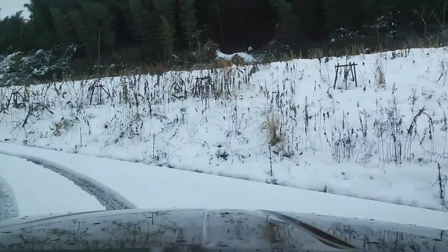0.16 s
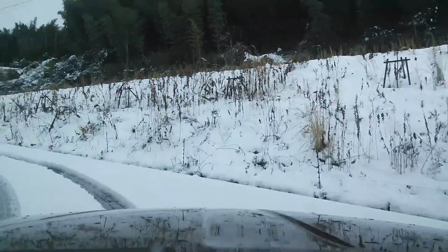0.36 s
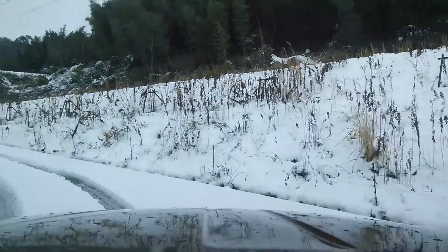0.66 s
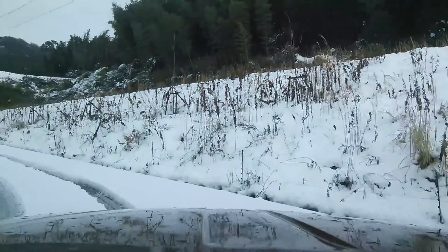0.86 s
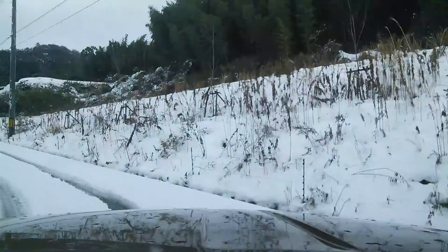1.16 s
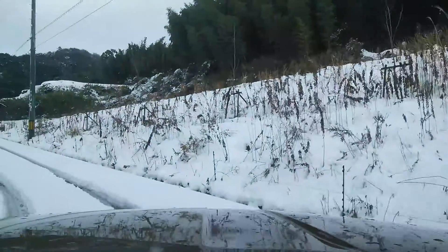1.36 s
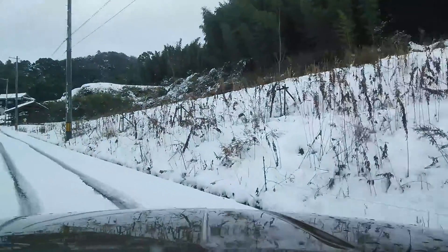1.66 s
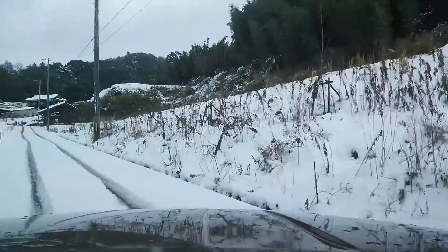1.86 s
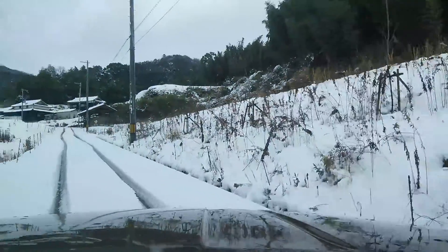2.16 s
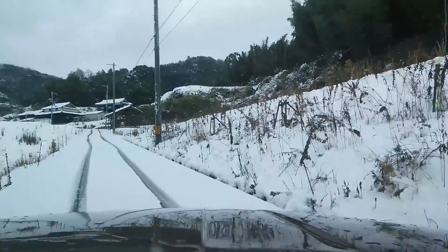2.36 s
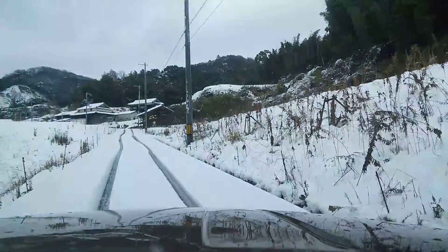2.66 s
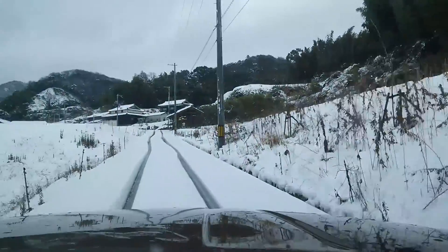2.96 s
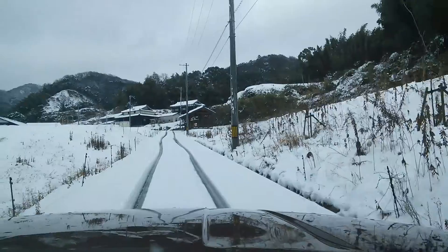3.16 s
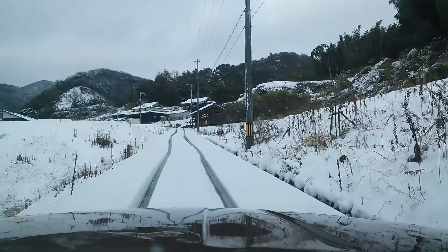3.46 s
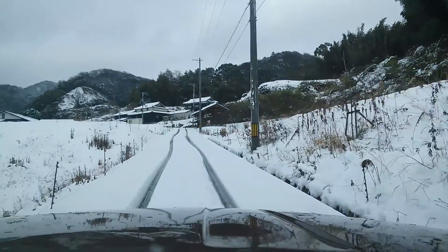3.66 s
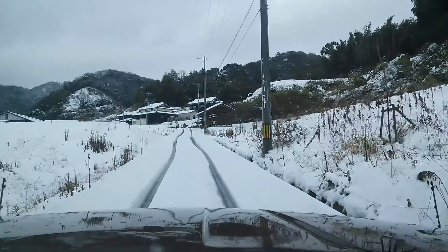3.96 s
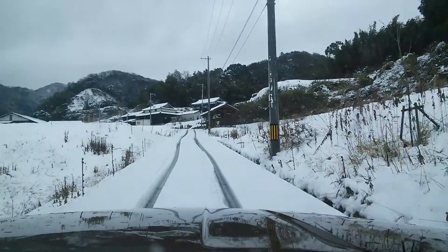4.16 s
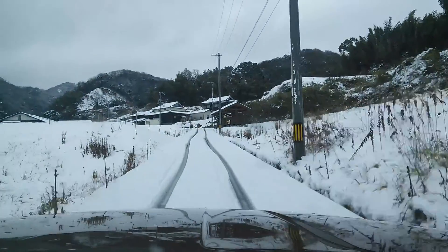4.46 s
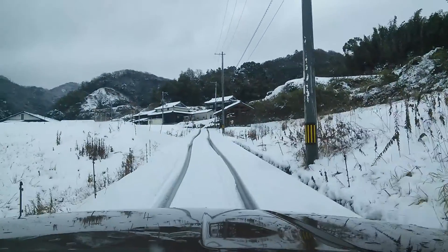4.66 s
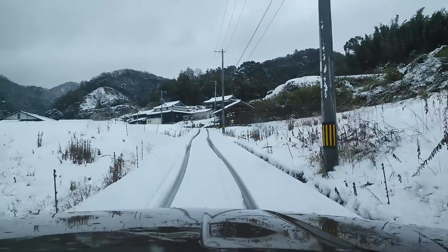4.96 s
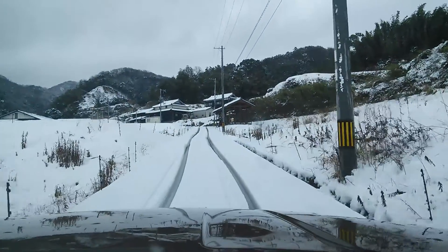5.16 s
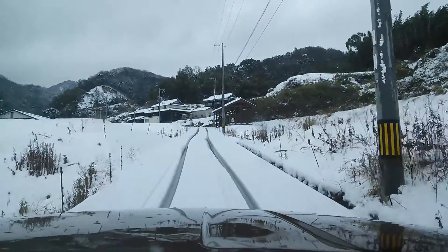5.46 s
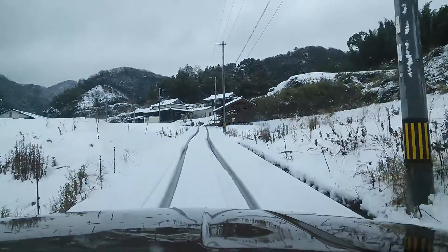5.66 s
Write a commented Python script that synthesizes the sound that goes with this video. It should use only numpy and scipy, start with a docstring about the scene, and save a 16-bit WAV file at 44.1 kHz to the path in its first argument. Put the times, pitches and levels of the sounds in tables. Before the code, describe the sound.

From inside a slow car on a snow-covered lane, a steady muffled engine drone dips at the start, recovers, then gradually climbs and strengthens. Soft tyre rumble and grainy snow crunch run beneath. A distinct body knock comes before one second; slush ticks and hiss grow busier later, with lighter bumps after four seconds. The microphone sits close in the cabin, behind the windscreen.

```python
"""Inside a car creeping along a snowy lane, slowly gathering speed.
From 0 s: a four-cylinder engine as sines at multiples of its cycle rate, a cabin boom, valve clatter and whines through
resonances; tyre rumble, rut jolts and wet-snow hiss as coloured noise; snow crunch as grains; faint treble tones.
From 0.1 s a short gliding steering whine; from 0.27 s slush ticks, as noise bursts and blurred rings; from 0.4 s crushed
clods, as swells of grains; from 0.6 s decaying sines: rut thuds, knocks over bumps, squeaks near 3.7 s."""
import sys
import numpy as np
from scipy import signal
from scipy.fft import rfft, irfft, next_fast_len
from scipy.io import wavfile
from scipy.ndimage import uniform_filter1d, map_coordinates

SR = 44100
rng = np.random.default_rng(int(sys.argv[2]) if len(sys.argv) > 2 else 0)


def pcm_store(signal):
    """Save signal as 16-bit PCM."""
    levels = np.round(np.clip(np.atleast_2d(signal), -1, 1) * 32767)
    wavfile.write(sys.argv[1], SR, levels.astype(np.int16).T)


N = 255780

# Levels are relative: the functions add trims and random wavering.
# engine speed: [t/s, four-stroke cycle rate/Hz]
CYCLE_RATE_HZ = [(0.0, 16.41), (0.24, 15.19), (0.42, 15.68), (0.58, 16.32), (0.82, 15.96), (1.18, 16.41),
                 (1.45, 16.26), (2.25, 16.89), (2.8, 17.91), (3.06, 18.38), (3.4, 17.98), (4.18, 18.7),
                 (4.4, 18.2), (4.58, 18.63), (4.8, 18.77), (5.0, 19.28), (5.4, 19.88), (5.8, 20.84)]
# how hard the engine pulls: [t/s, level/dB]
LOAD_DB = [(0, -45.5), (.25, -47), (.5, -38), (.85, -32.5), (1.5, -31.5), (2, -35), (2.5, -33),
           (2.78, -37.5), (3.05, -34.5), (3.6, -36.5), (4.2, -33.5), (4.42, -40.5), (4.7, -35),
           (4.95, -28.5), (5.1, -32), (5.3, -28.5), (5.55, -25.5), (5.8, -25)]
# engine block vibration: [multiple of cycle rate, level/dB]
BLOCK_LINES = [(6, -12), (7, -4.5), (9, -6), (10, -5), (11, 1), (12, 1), (13, 9.5), (14, -0.5), (16, -4),
               (17, -9), (18, -4.5), (19, -18.5), (20, -18), (21, -6), (22, -6.5), (23, -9), (24, -4),
               (25, -10.5), (26, -4), (27, 3), (28, -15.5), (29, -9), (30, 5), (31, 19), (32, 23)]
# transmission of mounts and panels into the cabin: [f/Hz, level/dB]
BODY_RESPONSE = [(80.0, -42), (170.0, -23.5), (210.0, -12.5), (240.0, -16.5), (275.0, -18.5),
                 (320.0, -12.5), (360.0, 0.5), (385.0, -7.5), (415.0, 6), (440.0, 2), (465.0, -9.5),
                 (500.0, -33), (600.0, -42), (720.0, -63)]
# panel shaken most by uneven firing: [f/Hz, width/Hz, level/dB]
SHUDDER_PANEL_MODES = [(411, 30.3, 0)]
# cabin air response to twice the firing rate: [f/Hz, level/dB]
CABIN_AIR_RESPONSE = [(122, -47), (125, -42), (128, -39.5), (134, -42), (141, -51), (146, -52), (149, -56),
                      (154, -43), (165, -45.5)]
# deep rumble from ruts: [t/s, level/dB]
RUT_LEVEL_DB = [(0, -49.5), (.3, -70.5), (.62, -56), (1.1, -49), (1.3, -58), (1.7, -54.5), (2.18, -46),
                (2.38, -49.5), (2.65, -47.5), (3.5, -56.5), (4.1, -57), (4.7, -61), (5.1, -54),
                (5.8, -52.5)]
# valve clatter: [t/s, level/dB]
VALVE_LEVEL_DB = [(0, -49.5), (.45, -52), (.85, -50.5), (1.3, -52.5), (1.8, -52.5), (2.3, -49), (3, -48),
                  (4.2, -47.5), (4.4, -50), (4.7, -47.5), (5.8, -45)]
# valve train resonances: [f/Hz, width/Hz, level/dB]
VALVE_MODES = [(723, 86, 6), (850, 110, 2.5), (915, 68, 13), (1015, 202, -0.5), (1213, 67, -6),
               (1380, 41, 7.5), (1618, 27, -4), (1930, 210, -9), (2670, 120, -8)]
# engine whine: [t/s, level/dB]
WHINE_LEVEL_DB = [(0, -68), (1.2, -59.5), (1.8, -46), (2.2, -53.5), (2.7, -53.5), (2.9, -48.5),
                  (3.6, -51.5), (4.2, -48.5), (4.38, -63), (4.6, -45.5), (5.05, -48.5), (5.8, -47.5)]
# whining engine overtones: [multiple of cycle rate, level/dB]
WHINE_LINES = [(48, 4.5), (56, 4), (66, -3), (72, -3), (74, -2), (76, -6)]
# cover resonances the overtones sweep through: [f/Hz, width/Hz, level/dB]
COVER_MODES = [(958, 35, 6.5), (1100, 86, -3.5), (1355, 100, 2.5)]
# transmission of the bulkhead: [f/Hz, level/dB]
BULKHEAD_RESPONSE = [(1000, -2.5), (2000, 1.5), (2750, -1), (3300, -14.5), (5000, -13), (9000, -31)]
# tyre rumble in the cabin: [f/Hz, level/dB per Hz]
ROAD_SPECTRUM = [(40, -27), (100, -14), (160, -4.5), (220, -1.5), (330, 2), (560, -2.5), (830, -10.5),
                 (980, -10), (1180, -18), (1650, -15), (2250, -26), (2650, -25), (3200, -35), (7000, -52)]
# suspension rolling over ruts: [f/Hz, level/dB per Hz]
RUT_SPECTRUM = [(10, -14), (25, -2), (42, -6), (70, -3), (100, -4), (160, 1), (400, -58)]
# panel resonances: [f/Hz, width/Hz, level/dB]
PANEL_MODES = [(445.3, 33.6, 2), (405, 114, -6.5)]
# wet-snow hiss, swelling in slushy stretches: [t/s, level/dB]
HISS_LEVEL_DB = [(0, -65.5), (.2, -74), (.5, -69.5), (.8, -63.5), (.95, -71), (1.08, -67.5), (1.3, -76),
                 (1.55, -69), (1.75, -71), (1.95, -68), (2.15, -72), (2.42, -69.5), (2.55, -62.5),
                 (2.78, -57), (3.02, -63.5), (3.45, -54.5), (3.75, -61.5), (4.05, -64), (4.3, -62.5),
                 (4.43, -68), (4.76, -50.5), (5.03, -63.5), (5.4, -68), (5.55, -60.5), (5.8, -62.5)]
# wet snow under the tyres: [f/Hz, level/dB per Hz]
WET_SPECTRUM = [(1500, -32), (2800, -5.5), (4200, 2), (5600, -4.5), (7500, 1.5), (9500, 2.5), (13000, 1),
                (16000, 1.5)]
# thin hiss left where the snow is dry: [f/Hz, level/dB per Hz]
DRY_SPECTRUM = [(2000, -6), (3700, -1.5), (4900, -4), (5750, 3.5), (6600, -3), (7800, -5.5), (10000, -1.5),
                (13000, -0.5), (15700, -0.5)]
# final drive whine, follows road speed: [t/s, f/Hz, level/dB]
GEAR_WHINE = [(0, 590, -66), (.6, 603, -53), (1.2, 611, -51), (1.8, 616, -52), (2.55, 652, -53),
              (3.0, 680, -62), (3.95, 708, -58), (4.2, 717, -46), (4.45, 728, -49.5), (4.55, 735, -56),
              (4.66, 744, -43.5), (4.78, 752, -56), (4.95, 764, -49.5), (5.25, 783, -55), (5.8, 820, -58)]
# faint treble singing: [f/Hz, level/dB]
SINGING_TONES = [(5922, -86), (8904, -91), (9889, -86)]
# short thin whine while steering out of the bend: [t/s, f/Hz, level/dB]
STEERING_WHINE = [(.1, 785, -75), (.2, 772, -52), (.28, 765, -48), (.4, 768, -54), (.5, 770, -120)]
# slush hits on the wheel arches:
# [t/s, peak level/dB, spray re peak/dB, ring f/Hz, ring re peak/dB, ring t60/s]
SLUSH_HITS = [(0.27, -36, -35.5, 2320, -10, .06), (0.471, -48, -12.5, 3230, 3, 0.08),
              (0.522, -43.5, -22, 3800, -3, 0.076), (0.992, -50, -25, 4700, -6, .06),
              (1.068, -52, -5.5, 2870, 5, 0.091), (1.516, -54.5, -23, 4600, -2, .07),
              (1.869, -44, -21, 4700, -13, .06), (2.462, -39.5, -15, 3050, -7, 0.076),
              (2.6567, -40, -21, 4900, -3, .06), (2.704, -38.5, -32, 4600, -8, .06),
              (2.741, -45.5, -25.5, 4550, -6, .06), (3.043, -40.5, -10.5, 5510, -6, .06),
              (3.618, -36, -10.5, 2700, -14, 0.072), (3.677, -48.5, 0, 5300, -8, .06),
              (3.75, -45.5, 7.5, 5160, -9, .06), (3.872, -47, -13.5, 4500, -9, .07),
              (3.912, -41, -10, 2880, 5.5, .14), (4.2453, -29.5, -12, 3510, -11, .17),
              (4.2875, -48.5, 4, 3350, -6, .08), (4.485, -47, -28, 4380, -6, .06),
              (4.5158, -42.5, -5, 2930, 5.5, 0.14), (4.55, -45, -15.5, 2700, -2, .08),
              (4.741, -40.5, -20.5, 2750, 3, .07), (4.826, -40, -5, 3730, -3, 0.17),
              (4.8673, -43, -1.5, 3850, 3, 0.098), (4.922, -54, 7.5, 2830, 2, .07),
              (5.081, -46, -9, 4350, -7, .07), (5.109, -38, -7.5, 2850, -3, 0.14),
              (5.135, -40.5, -8.5, 2980, -5, .12), (5.44, -36, -5, 5170, -10, 0.11),
              (5.4937, -42.5, -2, 4400, -9, .07), (5.7215, -39.5, -11, 4650, -13, 0.064),
              (5.759, -43, -10.5, 4250, -2, .07)]
# wheel arch resonances: [f/Hz, width/Hz, level/dB]
ARCH_MODES = [(2260, 440, 0.5), (2740, 440, 4), (3610, 130, 5), (4580, 750, 4.5), (5700, 1600, 0.5),
              (6570, 330, 1.5)]
# spread of a wet spot's ring: [offset from its pitch f/Hz, level/dB]
RING_BLUR_SPECTRUM = [(380, 0), (750, -12), (2200, -70)]
# bright spray of a slush hit: [f/Hz, level/dB]
SPRAY_SPECTRUM = [(4000, -39.5), (7500, 4.0), (11500, 2.0), (16000, -2.5)]
# packed-snow clods crushed under a tyre: [t at middle/s, length/s, level/dB, f/Hz]
CLOD_EVENTS = [(0.406, 0.13, -36.5, 360), (1.526, 0.079, -45, 857), (2.274, 0.072, -48, 1080),
               (2.546, 0.11, -45, 615), (2.797, 0.089, -49, 796), (2.863, 0.072, -37, 567),
               (3.123, 0.32, -56, 1300), (4.05, 0.066, -39.5, 608), (4.19, 0.11, -49, 1240),
               (4.415, 0.056, -41, 668), (4.7, 0.045, -40, 657), (5.033, 0.066, -48, 653),
               (5.16, 0.21, -46, 1060)]
# soft thud of a wheel dropping into a rut: [t/s, level/dB, f/Hz]
THUD_EVENTS = [(0.62, -42, 58), (2.19, -35, 78), (2.36, -40, 66), (2.65, -40, 72), (4.11, -43, 48)]
# body knocks over bumps: [t/s, level/dB, dulling/(dB per octave)]
KNOCK_EVENTS = [(0.822, -15, 2.5), (4.183, -26.5, 10), (4.399, -34, 9), (4.716, -28, 9), (4.777, -29, 9)]
# body modes a knock rings: [f/Hz, level/dB, t60/s]
KNOCK_BODY_MODES = [(345, -4, .1), (435, 1, .1), (550, -2, .07), (585, -2, .07), (800, -9, .05),
                    (1020, -8, .06), (1230, -9, .06), (1400, -12, .05), (1560, -11, .05)]
# tiny squeaks: [t/s, level/dB, f/Hz]
SQUEAK_EVENTS = [(3.676, -49.5, 5330), (3.754, -45.5, 5380), (3.753, -53.5, 4140)]

CRUISE_RATE_HZ = 18  # engine cycle rate at which the next two base levels hold
ROAD_DB, ROAD_RISE_DB_PER_HZ = -40.5, 1
GROWL_DB, GROWL_RISE_DB_PER_HZ = -42, 8  # no further rise above cruise
THROB_MULTIPLE, THROB_LAG_S = 24, .035  # throb centres on this multiple, falls later in the cycle at speed
SHUDDER_DB = -13  # random shaking by uneven firing, re engine load
BOOM_RUT_SHARE, USUAL_RUT_DB = 0.83, -54.5  # boom swells by this share of the rut level above usual
CLATTER_PEAK_CYCLES = .17  # strongest here and half a cycle later
ROAR_PATCH_DB, ROAR_SWELL_DB = 1.8, 1.3  # rms depths: random patches; swelling
SHAKE_DB = -3.5  # panel shaking re mean of road and load levels
TRIM_HZ = 1500  # cabin trim absorbs panel sound above this
TOP_HZ = 15850


def amp(db):
    """Decibels to gain."""
    return 10 ** (np.asarray(db) / 20)


def unit(x):
    """Scale to rms 1."""
    return x / np.sqrt(np.mean(x ** 2) + 1e-20)


def along(points, hz):
    """(f/Hz, value) points read on a log-frequency axis."""
    f, v = np.transpose(points)
    return np.interp(np.log(hz + 1), np.log(f + 1), v)


def curves(rows):
    """One value per sample for each column after the time."""
    s, *cols = np.transpose(rows)
    return [np.interp(np.arange(N) / SR, s, c) for c in cols]


def wobble(rate_hz):
    """Smooth random curve, rate_hz knots a second."""
    coarse = np.arange(0, N + 100, 100)
    knots = rng.standard_normal(1024)
    smooth = map_coordinates(knots, [coarse * rate_hz / SR], mode="mirror")
    return np.interp(np.arange(N), coarse, smooth)


def filtered(x, response):
    """x times a complex response of frequency."""
    m = next_fast_len(N + SR // 2)
    return irfft(rfft(x, m) * response(np.fft.rfftfreq(m, 1 / SR)), m)[:N]


def resonate(x, modes):
    """x through parallel (f/Hz, width/Hz, level/dB) resonances of alternating sign."""
    def response(f):
        total = 0
        for k, (centre, width, db) in enumerate(modes):
            damping = 1j * f * width
            total = total + (-1) ** k * amp(db) * damping / (centre * centre - f * f + damping)
        return total
    return filtered(x, response)


def noise(spectrum):
    """Noise of rms 1 with the given colour."""
    return unit(filtered(rng.standard_normal(N), lambda hz: amp(along(spectrum, hz))))


def panel_noise(modes):
    """Panels shaken at random, rms 1, dulled by the trim."""
    shaken = resonate(rng.standard_normal(N), modes)
    return unit(filtered(shaken, lambda hz: 1 / np.sqrt(1 + (hz / TRIM_HZ) ** 6)))


def patchy(x, depth_db, size):
    """x grows louder and softer in random patches of time and pitch; size is their (bins, frames)."""
    z = signal.stft(x, nperseg=2048)[2]
    field = rng.standard_normal(z.shape)
    for axis in (0, 1, 0, 1):
        field = uniform_filter1d(field, size[axis], axis)
    return unit(signal.istft(z * amp(depth_db * unit(field)), nperseg=2048)[1][:N])


def tone(rows, waver_db, slip_rad):
    """Unsteady sine along (t/s, f/Hz, level/dB) points with a wandering phase."""
    hz, db = curves(rows)
    phase = 2 * np.pi * np.cumsum(hz) / SR + slip_rad * wobble(35)
    return amp(db + waver_db * wobble(14)) * np.sqrt(2) * np.sin(phase)


def drone(rate_hz, cycle, load_db, growl_db, unsteady_db, slip_rad):
    """Unequal cylinders give lines at multiples of the cycle rate; each swells as it crosses a panel resonance."""
    growl, throb = np.zeros(N), np.zeros(N)
    lag_cycles = THROB_LAG_S * (rate_hz - CRUISE_RATE_HZ)
    for k, db in BLOCK_LINES:
        # bending waves run faster at high pitch: each throb reaches the cabin treble first
        delay_cycles = 1.2 * k - .0185 * k * k
        gain = amp(db + along(BODY_RESPONSE, k * rate_hz) + unsteady_db * wobble(4.925))
        phase = 2 * np.pi * (k * cycle - delay_cycles) + slip_rad * wobble(7.7)
        if k < 16:
            growl += gain * np.cos(phase)
        else:
            throb += gain * np.cos(phase - 2 * np.pi * (k - THROB_MULTIPLE) * lag_cycles)
    shudder = amp(SHUDDER_DB) * panel_noise(SHUDDER_PANEL_MODES)
    return amp(growl_db - .5) * unit(growl) + amp(load_db - 1) * (throb + shudder)


def boom(rate_hz, cycle, ruts_db):
    """Twice the firing rate excites the cabin air, loudly at a resonance and where the engine strains over ruts."""
    multiple = 8  # four firings per cycle, doubled
    boom_db = along(CABIN_AIR_RESPONSE, multiple * rate_hz) + BOOM_RUT_SHARE * (ruts_db - USUAL_RUT_DB)
    return amp(boom_db) * np.sqrt(2) * np.sin(2 * np.pi * multiple * cycle + 0.042 * wobble(8.4))


def valve_train(cycle, scatter_db, pulse_db):
    """Dense clatter, repeating each engine cycle and swelling once per crank turn, rings the engine's covers."""
    pattern = rng.standard_normal(512)
    clatter = unit(map_coordinates(pattern, [cycle % 1 * len(pattern)], mode="grid-wrap"))
    swell = amp(pulse_db * np.cos(2 * np.pi * 2 * (cycle - CLATTER_PEAK_CYCLES)))
    repeating = unit(resonate(swell * clatter, VALVE_MODES))
    scattered = unit(resonate(swell * rng.standard_normal(N), VALVE_MODES))
    return unit(repeating + amp(scatter_db) * scattered)


def whine(cycle, waver_db):
    """High overtones glide with the engine, beat once per crank turn and sing out at resonances."""
    slip_rad = .8 * wobble(14) + .4 * wobble(70)
    lines = np.zeros(N)
    for k, db in WHINE_LINES:
        gain = amp(db + waver_db * wobble(11))
        phase = 2 * np.pi * k * (cycle - CLATTER_PEAK_CYCLES) + slip_rad + .35 * wobble(14)
        lines += gain * np.sin(phase)
    return unit(resonate(lines, COVER_MODES))


def crunch(pitch_hz, spread, cycles, size_db, count):
    """Snow gives way under the treads in small muffled grains, each with its own pitch and size."""
    t = np.arange(SR // 25) / SR
    start, pitch, size = rng.random(count), rng.standard_normal(count), rng.standard_normal(count)
    hz = pitch_hz * np.exp(spread * np.clip(pitch, -2, 2))[:, None]
    gain = amp(size_db * np.clip(size, -2, 2))[:, None] * (pitch_hz / hz)
    age = hz * t / cycles
    grains = gain * age * np.exp(-age) * np.sin(2 * np.pi * hz * t)
    at = (start * N).astype(int)[:, None] + np.arange(len(t))
    return unit(np.bincount(at.ravel(), grains.ravel(), N)[:N])


def tyres(road_db, ruts_db, load_db):
    """Broad rumble from packed snow, deep jolts from ruts, panels shaken at random."""
    roar = patchy(noise(ROAD_SPECTRUM), ROAR_PATCH_DB, size=(4, 3))
    rumble = amp(road_db + 1.0 + ROAR_SWELL_DB * wobble(8.3)) * roar
    jolts = amp(ruts_db + 1.0 + 1.1 * wobble(9.0)) * noise(RUT_SPECTRUM)
    shaking_db = .5 * (road_db + load_db) + SHAKE_DB + 1.5 * wobble(20)
    shaken = amp(shaking_db) * panel_noise(PANEL_MODES)
    return rumble + jolts + shaken


def wet_snow(hiss_db, dry_db):
    """Thin hiss, growing fuller, louder and grainy where the treads press through slush."""
    total = amp(hiss_db + 1.6 * wobble(34))
    dry_gain = np.minimum(total, amp(dry_db))
    wet_gain = np.sqrt(np.abs(total ** 2 - dry_gain ** 2))
    crackle = unit(amp(2.8 * rng.standard_normal(N // 64 + 1)).repeat(64)[:N])
    return amp(4.0) * dry_gain * noise(DRY_SPECTRUM) + amp(4.5) * wet_gain * crackle * noise(WET_SPECTRUM)


def slush_ticks(attack_s, t60_s, tail_db, tail_t60_s, arch_db, spray_db):
    """Each bit of slush bursts in a short spatter and roughly rings its own spot of the wheel arch."""
    t = np.arange(SR // 4) / SR
    rise = 1 - np.exp(-t / attack_s)
    burst = rise * (amp(-60 * t / t60_s) + amp(tail_db - 60 * t / tail_t60_s))
    dull, bright = np.zeros((2, N + SR))
    rings = np.zeros(N + SR, complex)
    for s, db, bright_db, hz, ring_db, ring_t60_s in SLUSH_HITS:
        at = slice(round(s * SR), round(s * SR) + len(t))
        dull[at] += amp(db + arch_db) * burst
        bright[at] += amp(db + bright_db + spray_db) * burst
        rings[at] += amp(db + ring_db - 60 * t / ring_t60_s) * rise * np.exp(2j * np.pi * hz * t)
    arch = unit(resonate(rng.standard_normal(N), ARCH_MODES))
    spray = noise(SPRAY_SPECTRUM)
    blur = .5 * (noise(RING_BLUR_SPECTRUM) + 1j * noise(RING_BLUR_SPECTRUM))
    return dull[:N] * arch + bright[:N] * spray + amp(-1.5) * (rings[:N] * blur).real


def clods(spread, cycles, size_db, count):
    """Each clod collapses in a swell of grains around its own pitch."""
    t = np.arange(N) / SR
    out = np.zeros(N)
    for s, length_s, db, hz in CLOD_EVENTS:
        swell = np.exp(-2 * ((t - s) / length_s) ** 2)
        out += amp(db) * swell * crunch(hz, spread, cycles, size_db, count)
    return out


def thuds(swell_s):
    """The sprung body heaves briefly after each rut: a low sine that swells and dies."""
    t = np.arange(SR // 4) / SR
    age = t / swell_s
    out = np.zeros(N + SR)
    for s, db, hz in THUD_EVENTS:
        out[round(s * SR):][:len(t)] += amp(db) * age * np.exp(1 - age) * np.sin(2 * np.pi * hz * t)
    return out[:N]


def knock(attack_s):
    """A blow rings the body briefly; the softer it is, the less it stirs the high modes."""
    t = np.arange(SR // 4) / SR
    rise = 1 - np.exp(-t / attack_s)
    out = np.zeros(N + SR)
    lowest_hz = KNOCK_BODY_MODES[0][0]
    for s, blow_db, dull_db in KNOCK_EVENTS:
        ring = np.zeros(len(t))
        for hz, db, t60_s in KNOCK_BODY_MODES:
            mode_db = db - dull_db * np.log2(hz / lowest_hz)
            ring += amp(mode_db - 60 * t / t60_s) * np.sin(2 * np.pi * hz * t)
        out[round(s * SR):][:len(t)] += amp(blow_db) * ring * rise
    return out[:N]


def squeaks(rise_s, t60_s):
    """Brief, nearly pure stick-slip squeaks."""
    t = np.arange(SR // 8) / SR
    rise = 1 - np.exp(-t / rise_s)
    out = np.zeros(N + SR)
    for s, db, hz in SQUEAK_EVENTS:
        out[round(s * SR):][:len(t)] += amp(db - 60 * t / t60_s) * rise * np.sin(2 * np.pi * hz * t)
    return out[:N]


def scene():
    """Engine, tyres and snow as heard behind the windscreen; engine speed drives growl, boom and road levels."""
    rate_hz, = curves(CYCLE_RATE_HZ)
    load_db, = curves(LOAD_DB)
    ruts_db, = curves(RUT_LEVEL_DB)
    hiss_db, = curves(HISS_LEVEL_DB)
    whine_db, = curves(WHINE_LEVEL_DB)
    valve_db, = curves(VALVE_LEVEL_DB)
    cycle = np.cumsum(rate_hz) / SR
    excess_hz = rate_hz - CRUISE_RATE_HZ
    growl_db = GROWL_DB + GROWL_RISE_DB_PER_HZ * np.minimum(excess_hz, 0)
    road_db = ROAD_DB + ROAD_RISE_DB_PER_HZ * excess_hz

    engine = drone(rate_hz, cycle, load_db, growl_db, unsteady_db=.9, slip_rad=.1)
    engine += amp(-6.5 + 2.8 * wobble(16)) * boom(rate_hz, cycle, ruts_db)

    outside = amp(valve_db) * valve_train(cycle, scatter_db=-6, pulse_db=4)
    outside += amp(whine_db) * whine(cycle, waver_db=2.2)
    outside += amp(road_db - 5.5) * crunch(pitch_hz=913.0, spread=0.4127, cycles=3.8, size_db=4.0, count=1000)
    muffled = filtered(outside * amp(2.3 * wobble(20)), lambda hz: amp(along(BULKHEAD_RESPONSE, hz)))

    road = tyres(road_db, ruts_db, load_db) + wet_snow(hiss_db, dry_db=-66.0)
    whines = tone(GEAR_WHINE, waver_db=2, slip_rad=.55) + tone(STEERING_WHINE, waver_db=1.5, slip_rad=.4)
    singing = sum(tone([(0, hz, db)], waver_db=1.5, slip_rad=.6) for hz, db in SINGING_TONES)

    ticks = slush_ticks(attack_s=.004, t60_s=.045, tail_db=-17, tail_t60_s=.25, arch_db=-3.5, spray_db=5)
    ticks *= amp(2.2 * wobble(330) - 1)  # each spatter breaks into several grains
    road += clods(spread=0.074, cycles=3.7, size_db=3.0, count=700) + thuds(swell_s=0.0092)
    impacts = knock(attack_s=0.005) + squeaks(rise_s=0.0018, t60_s=0.075)
    return (engine + muffled + road + ticks + whines + singing + impacts)[None]


def record(dry):
    """Band limit: nothing passes at or above TOP_HZ."""
    return np.array([filtered(channel, lambda hz: hz < TOP_HZ) for channel in dry])


dry = scene()
out = record(dry)
pcm_store(out)
```